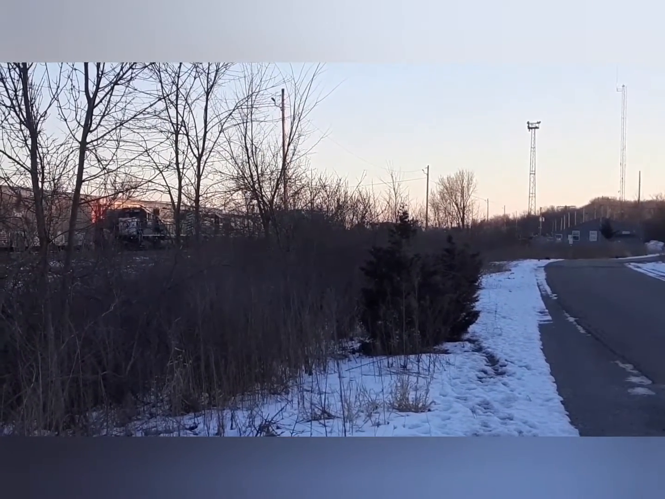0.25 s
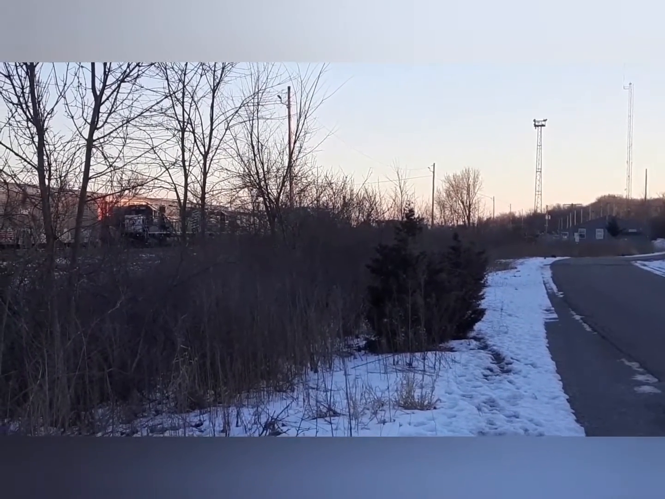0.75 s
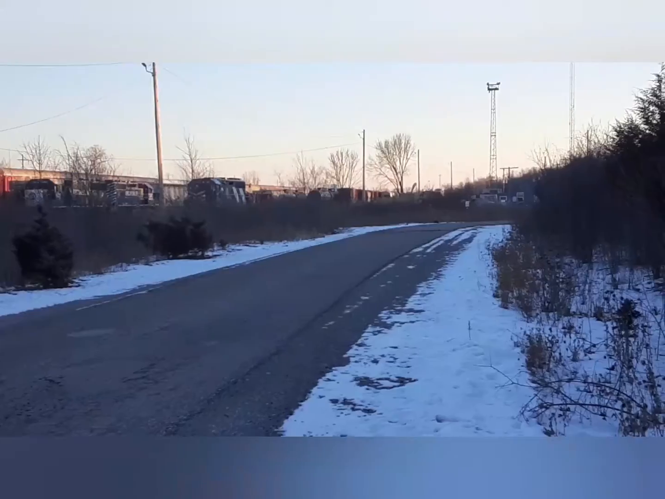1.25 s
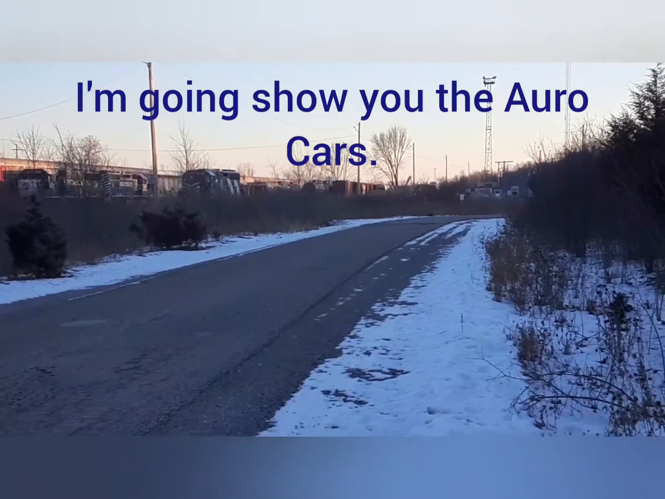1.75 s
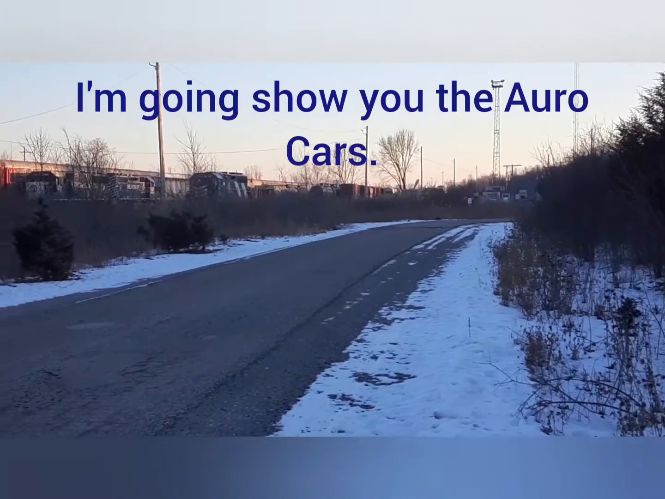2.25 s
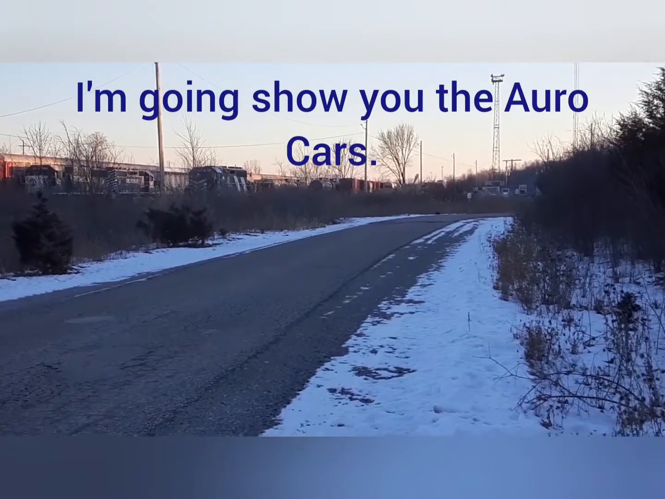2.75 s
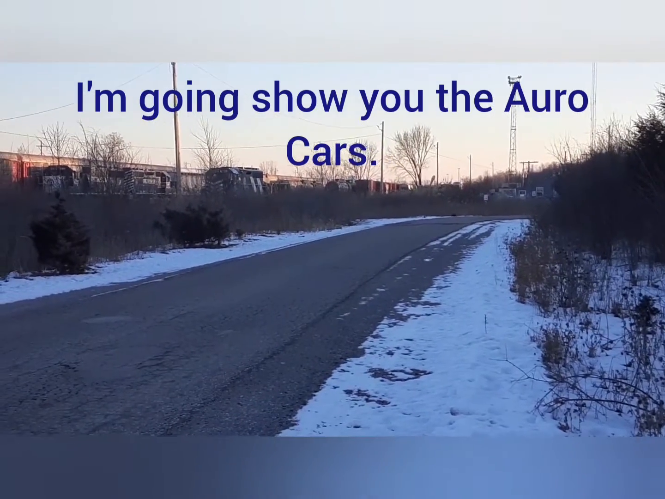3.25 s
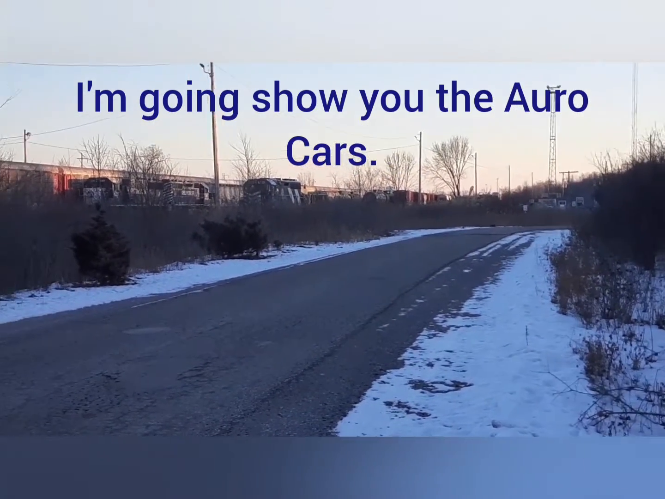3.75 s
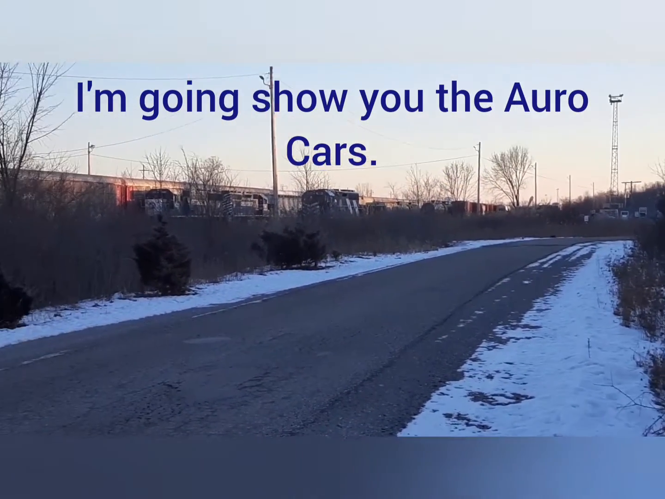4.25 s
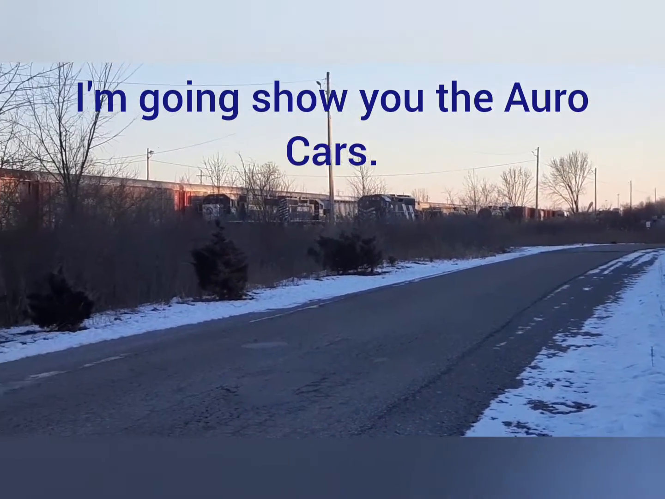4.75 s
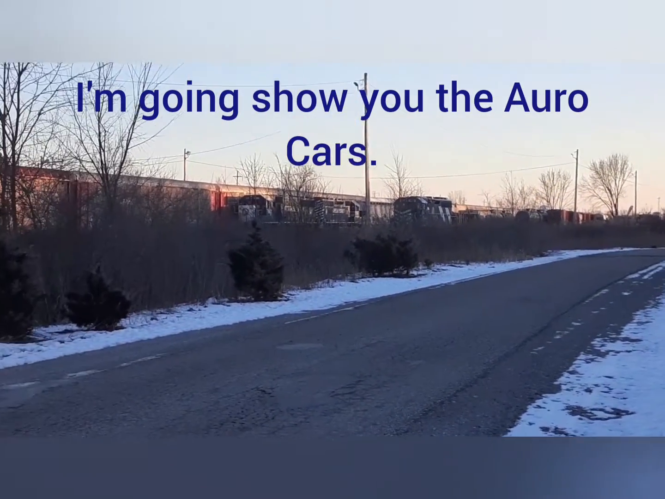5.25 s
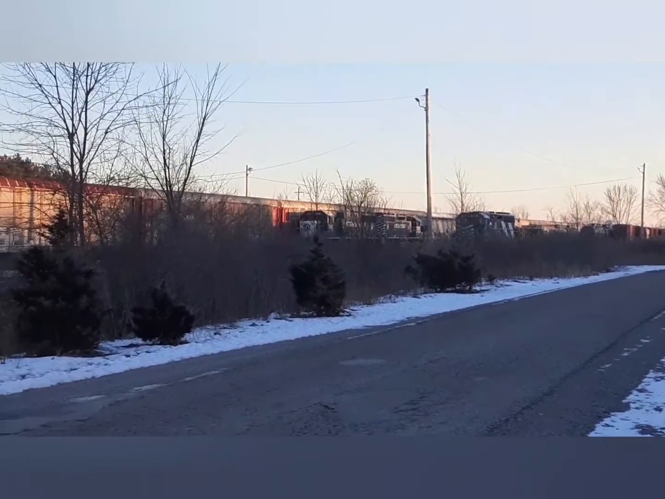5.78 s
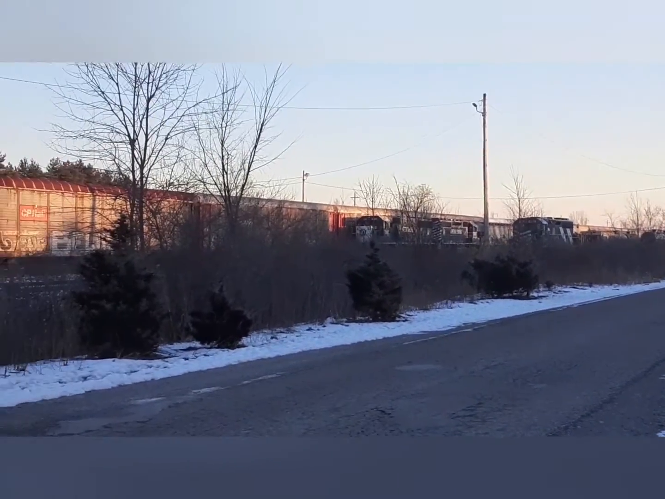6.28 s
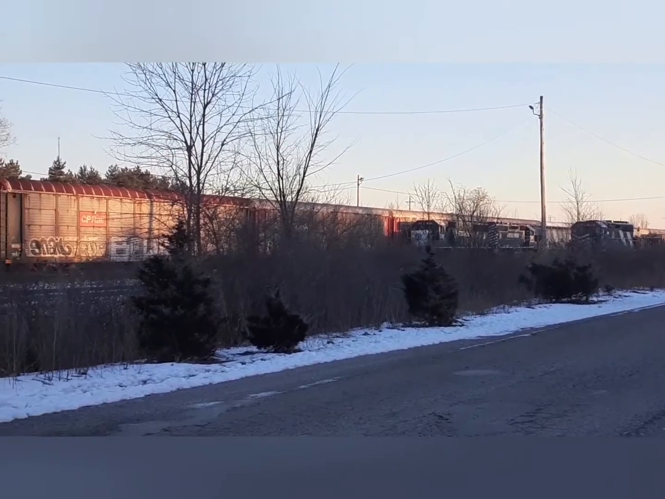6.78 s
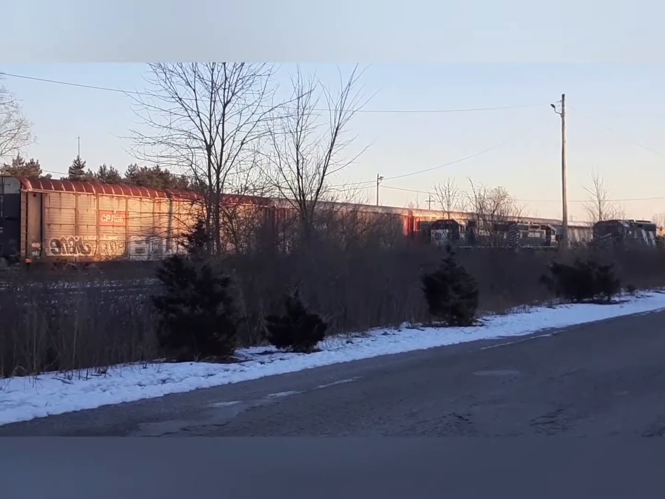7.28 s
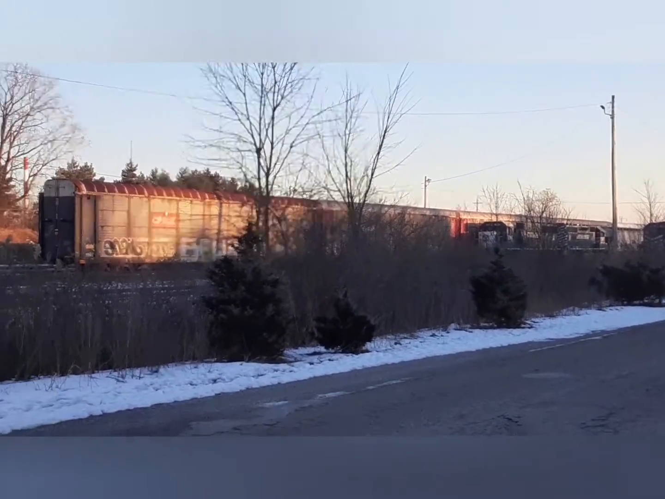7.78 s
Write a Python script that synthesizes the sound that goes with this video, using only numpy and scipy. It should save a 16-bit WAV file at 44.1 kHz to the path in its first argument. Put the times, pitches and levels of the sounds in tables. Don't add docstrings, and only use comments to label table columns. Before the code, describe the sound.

Two diesel locomotives idle across an open yard, low throbbing rumble beating under thin turbo whistles, steady whine, radiator roar and early wind thuds.

```python
import sys
import numpy as np
from scipy import signal
from scipy.fft import rfft, irfft, next_fast_len
from scipy.io import wavfile
from scipy.ndimage import uniform_filter1d, map_coordinates

SR = 44100
rng = np.random.default_rng(int(sys.argv[2]) if len(sys.argv) > 2 else 0)


def boost(x):
    u = np.asarray(x, float) / 20
    return 10 ** u


def to_wav(sig):
    pcm = np.clip(np.atleast_2d(sig), -1, 1) * 32767
    pcm = np.round(pcm).astype(np.int16)
    wavfile.write(sys.argv[1], SR, pcm.T)


N = 353682
SPOT_CHANGE_S = 1.2685


def rms_one(x):
    return x / np.sqrt(np.mean(x ** 2) + 1e-20)


def in_time(rows):
    s, *columns = np.transpose(rows)
    return [np.interp(np.arange(N) / SR, s, column) for column in columns]


def at_hz(points, hz):
    point_hz, value = np.array(points)[:, :2].T
    return np.interp(np.log(hz), np.log(point_hz), value)


def by_spot(first, second):
    return np.where(np.arange(N) < SPOT_CHANGE_S * SR, first, second)


def swells(events):
    t = np.arange(N) / SR
    return sum(db * np.exp(-((t - s) / half_s) ** 2) for s, db, half_s in events)


def drift(rate):
    r = np.exp(-80 * np.pi * rate / SR)
    slow = signal.lfilter([1], [1, -2 * r, r * r], rng.standard_normal(N // 40 + 4002))[4000:]
    return np.interp(np.arange(N) / 40, np.arange(len(slow)), rms_one(slow))


def scatter(width_hz):
    lowpass = signal.butter(2, width_hz, fs=SR / 20, output="sos")
    slow = signal.sosfilt(lowpass, rng.standard_normal((4, N // 20 + 2002)))
    a, b, c, d = [np.interp(np.arange(N) / 20, np.arange(N // 20 + 2), rms_one(v[2000:])) for v in slow]
    return np.array([a + 1j * b, c + 1j * d]) / np.sqrt(2)


def haze(hz, width_hz):
    return np.sqrt(2) * (scatter(width_hz) * np.exp(2j * np.pi * hz * np.arange(N) / SR)).real


def pan(x, db):
    return np.array([x * boost(db / 2), x * boost(-db / 2)])


def tone(hz, wander_hz, flutter_db):
    phase = 2 * np.pi * (np.cumsum(hz + wander_hz * drift(4.29)) / SR + rng.random())
    return np.sqrt(2) * np.sin(phase) * boost(flutter_db * drift(5)), phase


def bursts(events, low_hz, high_hz, decay_s, rise_s, alike):
    t, shape = np.arange(N) / SR, np.zeros(N)
    for s, db in events:
        after = np.maximum(t - s, 0)
        shape += boost(db) * (1 - np.exp(-after / rise_s)) * np.exp(-after / decay_s)
    band = signal.butter(2, [low_hz, high_hz], "band", fs=SR, output="sos")
    noise = signal.sosfilt(band, rng.standard_normal((2, N)))
    return rms_one(noise + alike * noise[::-1]) * shape


# (time [s], heading [0 first spot .. 2 facing train], left lag [samples])
HEADING = [
    (0, 0, -2),
    (1.268, 0, -2),
    (1.27, 1, -2.5),
    (3.5, 1, -2),
    (5, 1.5, 1),
    (6, 2, 4),
    (8.02, 2, 6),
]


def microphone_turn():
    return in_time(HEADING)


def arrive(x, lag):
    n = np.arange(N)
    left = map_coordinates(x[0], [n - lag / 2], order=3)
    right = map_coordinates(x[1], [n + lag / 2], order=3)
    return np.array([left, right])


def settling_db():
    return -5.5 * np.exp(-np.arange(N) / SR / 0.22)


# (time [s], depth [dB], half width [s])
LULLS = [(.18, -4, 0.027), (.265, -5, 0.025), (.42, -8, 0.049), (.66, -9, 0.012), (.735, -1, 0.013),
         (.93, -1.5, 0.016), (1.17, -3, 0.034)]


def lull_db():
    return swells(LULLS)


# (frequency [Hz], likeness [0..1])
LIKENESS = [(60, 0.91), (150, 1), (300, 0.85), (650, 0.83), (1200, 0.36), (2300, 0.69), (3500, .55),
            (7000, 0.39), (13000, 0.21)]
# (frequency [Hz], left-right level [dB])
BALANCE_DB = [(60, 10.5), (300, 1.5), (650, 1), (1200, 2), (2300, 2.5), (3500, -5.5), (7000, 7),
              (11000, 1.5), (16000, -8)]


def banded_noise(spectra, patchy_db, heading):
    hz, *columns = np.transpose(spectra)
    size = next_fast_len(N)
    white = rfft(rng.standard_normal((2, size), dtype=np.float32))
    step = 4 * np.log2(np.arange(size // 2 + 1) * SR / size + 1)
    out = 0
    for band in range(int(4 * np.log2(hz[0])) + 1, int(4 * np.log2(hz[-1])) + 1):
        overlap = np.maximum(1 - np.abs(step - band), 0).astype(np.float32)
        mid, side = irfft(white * overlap, size)[:, :N]
        centre = 2 ** (band / 4)
        level_db = [np.interp(np.log(centre), np.log(hz), column) for column in columns]
        alike = np.clip(at_hz(LIKENESS, centre), 0, .999)
        heading_db = np.interp(heading[::40], range(len(columns)), level_db)
        gain = boost(heading_db + patchy_db * drift(3.5)[::40])
        gain = np.interp(np.arange(N) / 40, np.arange(len(gain)), gain)
        both = np.sqrt(1 + alike) * mid + np.sqrt(1 - alike) * side * [[1], [-1]]
        out = out + gain * both * pan(1, at_hz(BALANCE_DB, centre))[:, None]
    return rms_one(out)


# (frequency [Hz], level per Hz [dB])
HISS = [(8000, -30), (9700, -16), (11000, -6), (13000, -6.5), (15000, -5), (16400, 1.5), (20000, -20)]
# (time [s], lift [dB], half width [s])
HISS_GUSTS = [(1.62, 4, .4), (4.3, 1, .4), (7.05, 6, .36)]


def microphone_hiss(heading):
    level_db = by_spot(-72.5 + 0.49 * settling_db(), -68.5 + swells(HISS_GUSTS))
    return boost(level_db + 10.0) * banded_noise(HISS, patchy_db=0.5, heading=heading)


# (time [s], peak level [dB])
PUFFS = [(0.206, -48), (0.306, -35), (0.489, -30), (0.574, -28), (0.686, -30), (0.785, -24), (1.069, -20.5),
         (1.211, -31.5)]


def wind_puffs():
    return boost(2.5) * bursts(PUFFS, low_hz=40, high_hz=200, decay_s=.025, rise_s=.012, alike=.1)


# (time [s], level [dB])
RUSTLE_LOW = [(.08, -52), (.3, -52), (.75, -50)]
RUSTLE_HIGH = [(.9, -56), (1.12, -59)]


def brush_rustle():
    low = bursts(RUSTLE_LOW, low_hz=2440, high_hz=2700, decay_s=0.067, rise_s=0.021, alike=.7)
    high = bursts(RUSTLE_HIGH, low_hz=2850, high_hz=3140, decay_s=0.15, rise_s=0.035, alike=.7)
    return low + high


# (time [s], peak level [dB])
TICKS = [
    (1.2655, -42),
    (4.0335, -31),
]


def ticks():
    click = bursts(TICKS[:1], low_hz=1500, high_hz=15000, decay_s=0.00055, rise_s=0.00015, alike=.8)
    tick = bursts(TICKS[1:], low_hz=1800, high_hz=4200, decay_s=0.0012, rise_s=0.00018, alike=.8)
    return boost(1.0) * click + boost(-7.0) * tick


# (frequency [Hz], level at heading 0 [dB], at heading 1 [dB], at heading 2 [dB])
RADIATOR = [(808, -5.5, -2.5, 0), (1183, -11, -7.5, -12), (1637, -11.5, -5.5, -1),
            (1828, -18.5, -29, -25.5), (2103, -12.5, -11.5, -9), (2305, -27.5, -21.5, -22),
            (2775, -11, -5, -16), (2987, -29, -24, -18), (4000, -24.5, -19.5, -19.5), (5100, -24, -20, -25),
            (5670, -29.5, -29.5, -28.5), (7500, -32, -26.5, -26), (8450, -39, -41.5, -48.5),
            (9590, -41.5, -39.5, -45)]
# (time [s], lift [dB], half width [s])
AIR_GUST = [(7.55, 2, 0.64)]


def radiator_air(heading):
    level_db = by_spot(-53.5, -54) + 0.66 * settling_db() + 0.17 * lull_db() + swells(AIR_GUST)
    return boost(level_db + 8) * banded_noise(RADIATOR, patchy_db=0.9, heading=heading)


# (frequency [Hz], level at first spot [dB], at second spot [dB])
RUMBLE = [(25, -36, -36), (44.7, -19, -8.5), (75, -3, -7.5), (111, -7, -5.5), (167, -21.5, -14),
          (390, -19, -17.5), (532, -13, -10.5), (725, -13.5, -17), (830, -18, -16), (1206, -51, -55)]


def yard_rumble(heading):
    level_db = by_spot(-36.5, -39.5) + settling_db() + 0.63 * lull_db()
    return boost(level_db + 1.92) * banded_noise(RUMBLE, patchy_db=0.7, heading=heading)


TONE_HZ = [1260, 1533.5, 1539, 1500, 2736.2, 3504, 3648.3, 6042, 7072.6, 8792]
# (level at first spot [dB], at second spot [dB], left-right level [dB], wander [Hz])
TONES = [(-76, -63.5, 4.5, 2.96), (-69, -59.5, 10.5, 2.33), (-65, -88, -2, 0.61), (-68, -58.5, 2, 2.54),
         (-70.5, -70.5, -3, 0.26), (-93, -79.5, -14.5, 0.29), (-77, -73, 14.5, 0.6), (-91, -76.5, 1.5, 2.5),
         (-86, -81.5, 15.5, 2.7), (-100, -105, 1, 3)]


def alternator_and_fans():
    out = 0
    for hz, (first_db, second_db, side_db, wander_hz) in zip(TONE_HZ, TONES):
        out = out + pan(boost(by_spot(first_db, second_db)) * tone(hz, wander_hz, flutter_db=2.0)[0], side_db)
    return out


# (time [s], change [dB], half width [s])
WHINE_FADES = [(.95, 5.5, .15), (3.1, -2, .3), (5.69, -2, .08), (6.15, -14, 0.14), (8.0, -2, 0.16)]


def alternator_whine():
    rising_db = -67 + 2 * (np.arange(N) / SR - SPOT_CHANGE_S)
    level_db = by_spot(-63, rising_db) + swells(WHINE_FADES)
    whine = tone(1824.1, wander_hz=.15, flutter_db=.3)[0]
    return pan(boost(level_db - 1) * whine, 7)


def whistle(hz, firing, below, above, skirt_db, width_hz):
    blade = 1 + below * np.exp(-1j * firing) * (.7 + .7 * scatter(5)) + above * np.exp(1j * firing) * scatter(5)
    blade += boost(skirt_db) * scatter(width_hz) + boost(skirt_db + 1.5) * scatter(5 * width_hz)
    blade += boost(skirt_db - 7) * scatter(22 * width_hz)
    phase = tone(hz, wander_hz=0.93, flutter_db=0)[1]
    wave = blade * np.exp(1j * phase) * np.exp(1j * np.array([[0], [2.2]]))
    wave = wave / np.sqrt(np.mean(np.abs(wave) ** 2))
    octave = wave * np.exp(1j * np.angle(wave))
    return np.sqrt(2) * wave.real, np.sqrt(2) * octave.real


FAR_BY_HEADING_DB = [-68, -72, -62.5]
# (time [s], lift [dB], half width [s])
FAR_SWELLS = [(.62, 2.5, .12), (1.0, 2, .08), (1.22, 4, .05), (4.38, 7, 0.31), (5.0, 8, .12),
              (5.69, 7, .06), (6.08, 3.5, 0.07), (6.27, 8, 0.11), (6.83, 6.5, .13), (7.24, 4, 0.068),
              (7.77, -2, .1)]


def far_turbocharger(firing, heading):
    level_db = np.interp(heading, range(3), FAR_BY_HEADING_DB) + swells(FAR_SWELLS)
    hz = by_spot(4520, 4511)
    far = whistle(hz, firing * .84, below=.45, above=.7, skirt_db=-7, width_hz=10)[0]
    return boost(level_db + 5.5) * far


# (time [s], level [dB], left-right level [dB])
WHISTLE = [(0.0, -64.5, 0.0), (0.76, -68, -1.0), (0.8, -59.5, -0.5), (1.41, -59, -3), (1.63, -50, 5),
           (1.85, -53.5, -9), (2.21, -48, 5), (2.37, -55.5, 4.5), (3.42, -58.5, -3.5), (3.48, -61, 1),
           (4.56, -51, 0.0), (5.23, -56.5, 1.0), (5.85, -55, 4.5), (6.7, -58, -8), (7.68, -50, -6),
           (7.77, -53, -15), (7.86, -54.5, -4), (8.02, -57, -15)]
# (time [s], lift [dB], half width [s])
OCTAVE_SWELLS = [(.6, 4, .3), (1.55, 8, .12), (2.0, 8, 0.53), (3.2, 3, .2), (4.15, 7, 0.33),
                 (6.15, 8.5, .3), (7.2, 7, .15), (7.7, 8.5, 0.27)]


def near_turbocharger(firing):
    level_db, side_db = uniform_filter1d(in_time(WHISTLE), size=SR // 10)
    octave_db = -79.5 + 5 + swells(OCTAVE_SWELLS)
    near, octave = whistle(5358, firing, below=.36, above=.15, skirt_db=-10, width_hz=14)
    near = near + boost(-21.5) * haze(hz=5720, width_hz=180)
    octave = octave + boost(-3) * haze(hz=10750, width_hz=260)
    return (boost(level_db + 9.5) * near + boost(octave_db) * octave) * pan(1, side_db)


# (crank order, level at first spot [dB], second spot [dB], left-right [dB])
GEARS = [(158, -54, -51, 2.5), (237, -72, -60, 1.1), (238, -57, -75, 1.1)]


def gears(turns):
    out = 0
    for order, first_db, second_db, side_db in GEARS:
        level_db = by_spot(first_db, second_db) + 0.67 * drift(4.3)
        mesh = np.sqrt(2) * np.sin(2 * np.pi * round(order) * turns)
        out = out + pan(boost(level_db) * mesh, side_db)
    return out


# (frequency [Hz], order level at first spot [dB], at second spot [dB])
CLATTER = [(190, -70, -58.5), (295, -79, -60), (380, -80, -80.5), (507, -72, -68.5), (716, -54.5, -56.5),
           (780, -77, -61.5), (904, -78, -83.5), (1210, -85, -89), (1700, -82, -73)]


def engine(speed, crank, spread, orders, ring, clatter_db):
    size = 4096
    turns = np.cumsum(speed) / SR
    low, *levels = np.transpose(orders)
    hz, *clatter = np.transpose(CLATTER)
    high = np.arange(int(low[-1]) + 1, 270)
    heard = []
    for start, level_db, colour_db in zip(crank, levels, clatter):
        lines = np.zeros(size // 2 + 1, complex)
        lines[low.astype(int)] = boost(level_db) * np.exp(2j * np.pi * spread * low ** 2)
        uneven = rng.standard_normal(len(high)) + 1j * rng.standard_normal(len(high))
        lines[high] = boost(np.interp(high * speed[-1], hz, colour_db) + clatter_db) * uneven / np.sqrt(2)
        for order, ring_db in ring:
            lines[order] *= boost(ring_db) / np.abs(lines[order])
        cycle = irfft(lines) * size / np.sqrt(2)
        angle = (turns + start) % 1 * size
        heard.append(np.interp(angle, np.arange(size + 1), np.append(cycle, cycle[0])))
    return by_spot(*heard), turns


# (crank order, level at first spot [dB], at second spot [dB])
SLOW_ORDERS = [(7, -69, -70), (8, -50, -46), (9, -62, -53), (10, -60, -55), (11, -53, -59), (12, -54, -51),
               (13, -51, -41), (14, -62, -45), (15, -37, -28), (16, -51, -42), (17, -43, -37),
               (18, -71, -49), (19, -62, -61), (20, -57, -59), (21, -60, -47), (22, -60, -62),
               (23, -66, -54), (24, -54, -52), (25, -56, -57), (26, -55, -65), (27, -62, -58),
               (28, -69, -58), (29, -70, -59), (30, -68, -70)]
# (crank order, level [dB])
SLOW_RING = [(50, -59), (101, -60), (128, -62), (134, -60), (144, -58), (158, -63)]
# (time [s], speed [rev per s])
SLOW_HUNT = [(1.27, 5.3014), (2.5, 5.301), (4.5, 5.3111), (8.02, 5.3212)]


def slow_engine():
    speed = by_spot(5.332, in_time(SLOW_HUNT)[0])
    return engine(speed, (.814, .662), .017, SLOW_ORDERS, SLOW_RING, clatter_db=-9.0)[0]


# (crank order, level at first spot [dB], at second spot [dB])
FAST_ORDERS = [(7, -61, -63), (8, -40, -37), (9, -44, -42), (10, -56, -45), (11, -41, -39), (12, -49, -48),
               (13, -42, -33), (14, -60, -55), (15, -42, -39), (16, -54, -47), (17, -49, -45),
               (18, -59, -62), (19, -60, -53), (20, -64, -67), (21, -67, -61), (22, -54, -74),
               (23, -61, -56), (24, -59, -48), (25, -61, -65), (26, -64, -49), (27, -73, -56),
               (28, -71, -58), (29, -70, -64), (30, -71, -58)]
# (crank order, level
# [dB])
FAST_RING = [(31, -60), (78, -57), (86, -56), (102, -55), (104, -54), (109, -57), (111, -54), (113, -53),
             (124, -61), (133, -63), (170, -68)]


def fast_engine():
    speed = np.full(N, 6.321)
    return engine(speed, (.870, .465), .056, FAST_ORDERS, FAST_RING, clatter_db=0.7)


def scene():
    heading, lag = microphone_turn()
    fast, turns = fast_engine()
    firing = 2 * np.pi * 8 * turns
    engine_db = by_spot(2 + 0.64 * settling_db() + lull_db(), 0)
    engines = pan((fast + slow_engine()) * boost(engine_db), by_spot(-.8, 2.4))
    air = yard_rumble(heading) + radiator_air(heading) + microphone_hiss(heading)
    yard = arrive(engines + gears(turns) + air, lag)
    whistles = near_turbocharger(firing) + far_turbocharger(firing, heading)
    tones = alternator_and_fans() + alternator_whine()
    return yard + whistles + tones + wind_puffs() + ticks() + brush_rustle()


def top_cut(x):
    return signal.sosfilt(signal.butter(12, 16800, fs=SR, output="sos"), x)


def record(dry):
    steep = signal.ellip(12, .5, 70, 15715, fs=SR, output="sos")
    return top_cut(signal.sosfilt(steep, dry))


dry = scene()
out = record(dry)
to_wav(out)
```